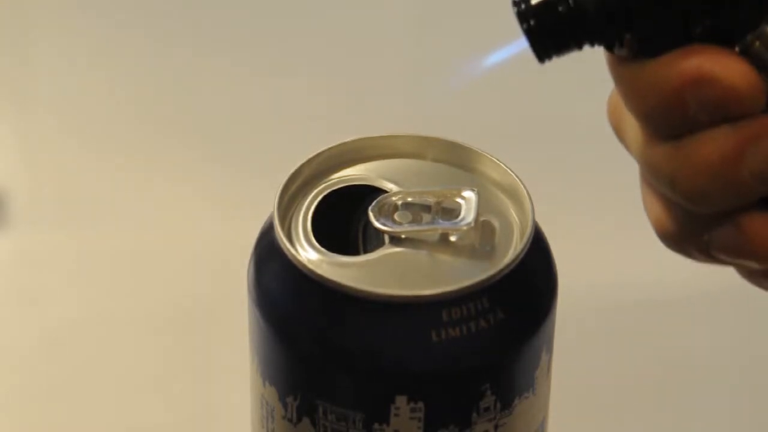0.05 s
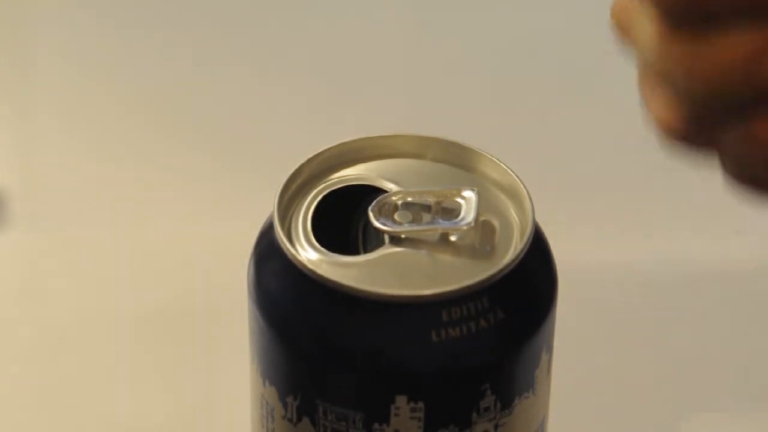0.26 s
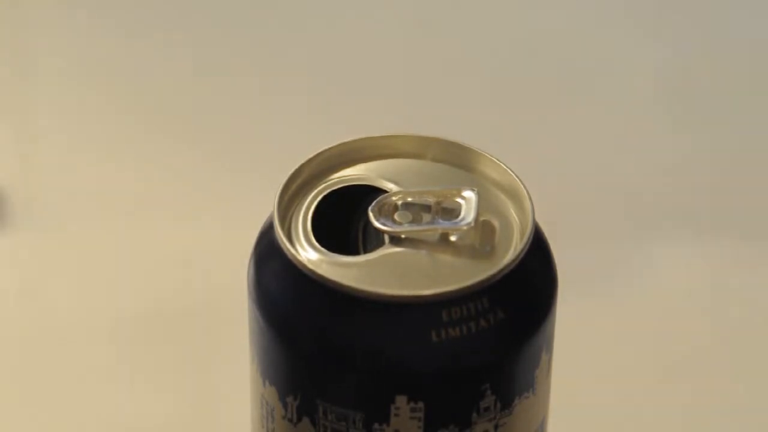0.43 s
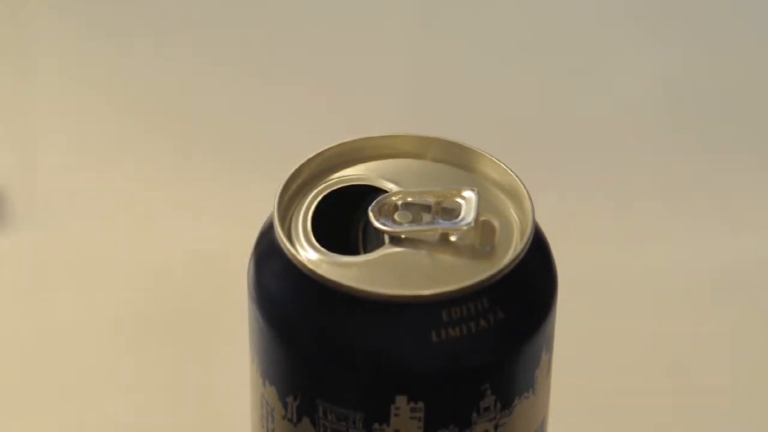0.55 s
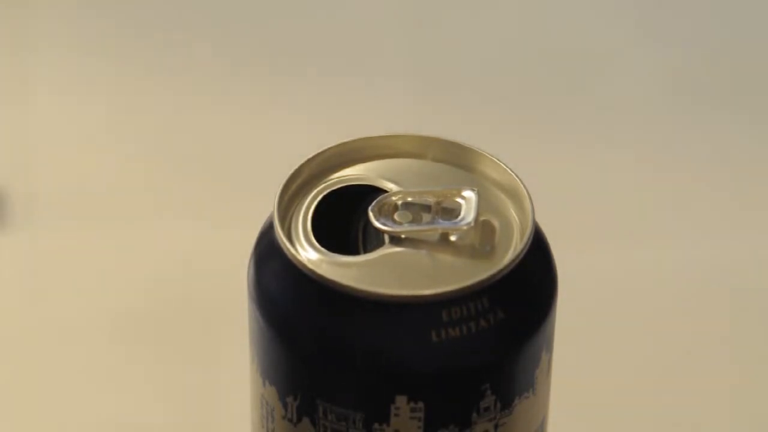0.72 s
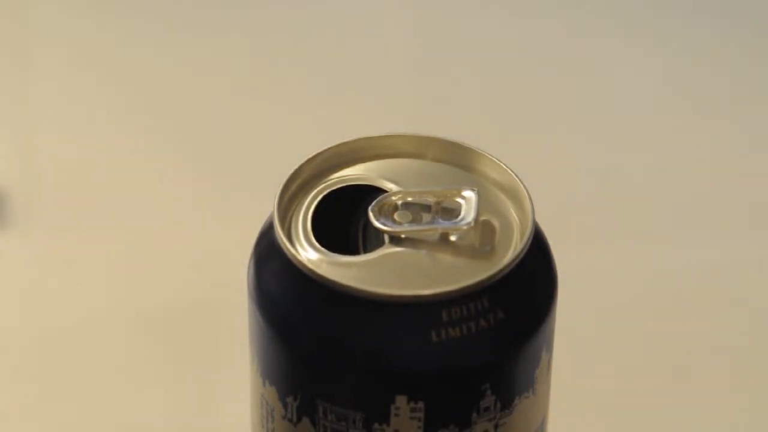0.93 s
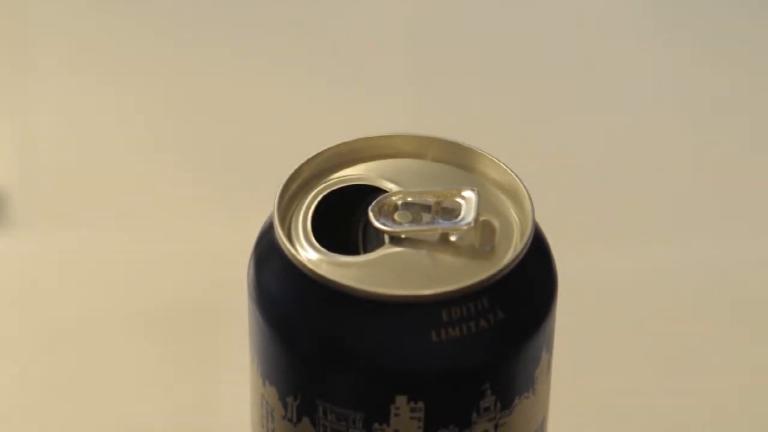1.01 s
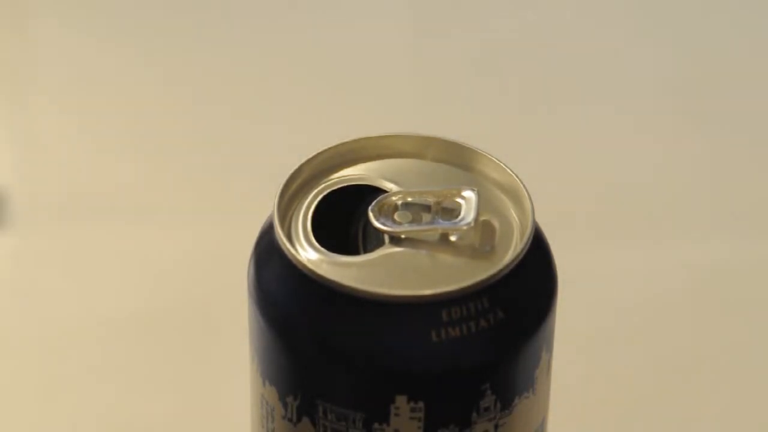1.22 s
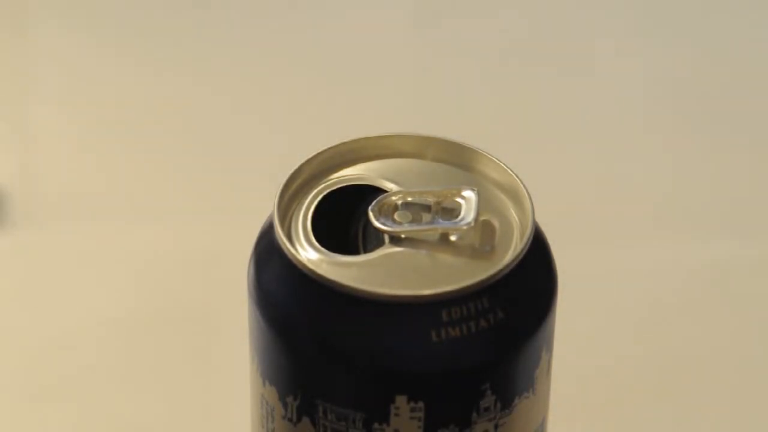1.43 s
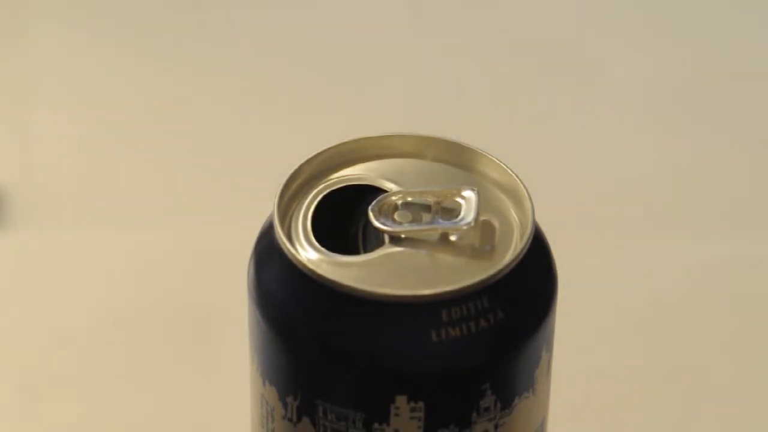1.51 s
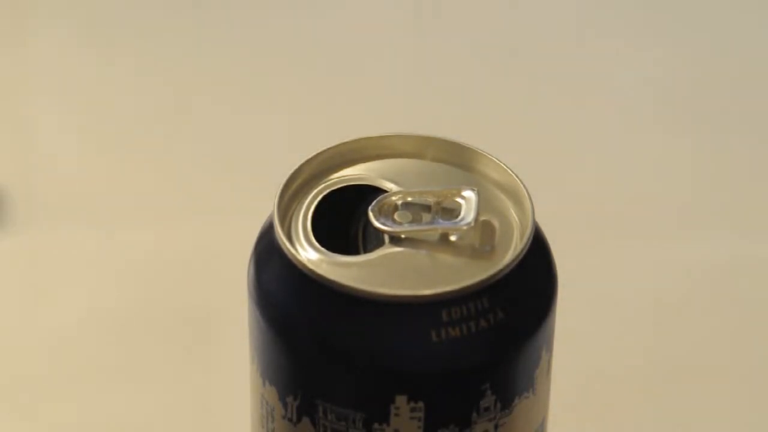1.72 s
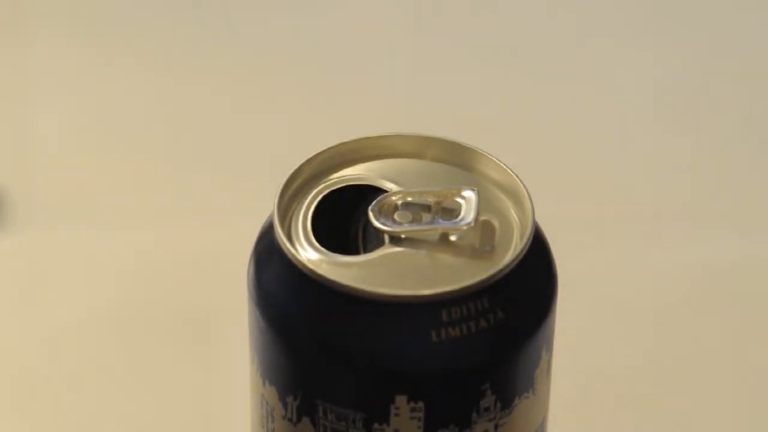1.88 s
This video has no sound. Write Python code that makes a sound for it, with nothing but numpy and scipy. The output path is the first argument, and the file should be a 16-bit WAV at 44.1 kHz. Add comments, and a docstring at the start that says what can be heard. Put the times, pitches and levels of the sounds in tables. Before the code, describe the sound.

Close up in a small, quiet room, a torch lighter's gas jet hisses briefly and stops with a sharp click. After that there is only a faint electrical and fan hum.

```python
"""A small quiet room, one microphone close to a butane torch lighter. At first the gas jet hisses
steadily and rings the nozzle. The trigger creaks with two small ticks as the thumb lets go, then at
0.21 s snaps back with one sharp click that shuts off the gas and rings briefly in the room.
The recorder, dull above the mid treble, just clips that click. Room tone remains:
a low mains and fan hum over moving air, with a faint hiss that comes and goes."""
import sys
import numpy as np
from scipy import signal
from scipy.fft import rfft, irfft, next_fast_len
from scipy.io import wavfile
from scipy.ndimage import map_coordinates

SR = 44100
rng = np.random.default_rng(int(sys.argv[2]) if len(sys.argv) > 2 else 0)


def put_to_file(sound):
    """Save the sound as 16-bit audio at rate SR, in the file named by the first command-line argument."""
    columns = np.atleast_2d(sound).T  # one column per channel
    safe = np.clip(columns, -1, 1)
    whole_steps = np.round(safe * 32767)
    wavfile.write(sys.argv[1], SR, whole_steps.astype(np.int16))


N = 85995
T = np.arange(N) / SR

# rush of the gas jet: f/Hz, relative level/dB
JET_SPECTRUM = [(100, -39.5), (400, -24), (600, -7), (850, 2.5), (1250, 2.5), (2000, -2.5), (2550, 7.5),
                (3050, 0.5), (3600, 3.5), (4050, -4.5), (4500, 1), (5400, 0.5)]
# nozzle resonances: f/Hz, width/Hz, relative level/dB
NOZZLE_MODES = [(1970, 90, 13.5), (2646, 90, 4), (2600, 64, -8), (3380, 250, -2), (4192, 100, -16),
                (4580, 110, -14.5), (5330, 80, 0)]
# trigger contacts, two ticks and the click's double strike: t/s, level/dB, tilt/(dB per octave)
TRIGGER_CONTACTS = [(0.1446, -26.5, -3), (0.1625, -39, -4), (0.20873, -0.6, 0), (0.21028, -12.5, 21)]
# colour of one contact: f/Hz, relative level/dB
SNAP_SPECTRUM = [(1000, -46.5), (1550, -23), (1900, -11.5), (2300, -15.5), (2750, -6.5), (3200, -0.3),
                 (3700, 0), (4300, -12.5), (5400, 2.5)]
# resonances of the lighter's body: f/Hz, width/Hz, relative level/dB
BODY_MODES = [(4470, 360, 9), (4874, 180, -6)]
# echoes off surfaces near the microphone: delay t/s, relative level/dB
EARLY_ECHOES = [(.0037, -13), (.0061, -20), (0.0104, -21.5), (0.0314, -56.5)]
# time the room's tail takes to fall 60 dB: f/Hz, t/s
TAIL_T60 = [(500, 0.13), (2500, .24), (5500, 0.24)]
# colour of the tail as it starts: f/Hz, relative level/dB
TAIL_SPECTRUM = [(1000, 0), (2700, 5), (3300, -7), (4100, 6), (4600, -2), (4870, -0.5), (5200, -4)]
# mains hum: f/Hz, level/dB
MAINS_TONES = [(120, -62.5), (240, -71), (360, -69)]
# fan hum: f/Hz, level/dB before wavering and swell, unsteadiness/ratio
FAN_TONES = [(201.5, -64, .25), (236, -78, 0.74), (283.7, -72.5, .4), (405.8, -63, 0.12)]
# swell of the fan hum: t/s, relative level/dB
FAN_ENVELOPE = [(0, 4.5), (.2, 4), (.3, 0), (.6, 1.5), (.8, -2), (1.05, -10.5), (1.25, -4.5), (1.45, 3),
                (1.7, 2), (1.95, 4)]
# colour of the moving air: f/Hz, relative level/dB
AIR_SPECTRUM = [(20, -45.5), (35, -11.5), (55, -15), (85, -7.5), (121, -4.5), (163, -7), (230, -1),
                (306, -8.5), (410, -3), (538, -9), (700, -7), (1080, -13), (1950, -14), (3830, -22),
                (5400, -22.5)]
# loudness of the moving air: t/s, level/dB
AIR_ENVELOPE = [(0, -56.5), (.7, -55.5), (1.25, -55.5), (1.45, -55.5), (1.95, -55.5)]
# colour of the faint treble hiss: f/Hz, relative level/dB
HISS_SPECTRUM = [(1000, -9.5), (2500, -8), (4000, -3.5), (4800, 0), (5300, -2)]
# loudness of that hiss: t/s, level/dB
HISS_ENVELOPE = [(.4, -79), (.73, -69.5), (.76, -59.5), (.86, -66), (1.28, -67), (1.34, -63), (1.4, -73.5),
                 (1.5, -83), (1.54, -61), (1.6, -80.5), (1.95, -80.5)]

JET_DB, NOZZLE_DB, FLUTTER_DB = -48, -54.5, 1
GAS_OFF_S, GAS_FALL_DB_PER_S = .208, 340
THUMP_HZ, THUMP_DB, THUMP_T60_S = 220, -32.5, .007  # dull push into the hand, level relative to the snap
TAIL_DB, TAIL_ONSET_S = -10.5, .002
BAND_HZ, BAND_ORDER, CLIP_TOP = 5570, 44, .72  # the recorder's treble limit and clipping ceiling


def gas_jet():
    """Close to the microphone, the gas rushes and rings the nozzle until the valve shuts."""
    rush = noise(lambda hz: amp(along(JET_SPECTRUM, hz)))
    ring = noise(lambda hz: resonances(hz, NOZZLE_MODES))
    flow_db = FLUTTER_DB * wobble(40) - GAS_FALL_DB_PER_S * np.maximum(T - GAS_OFF_S, 0)
    return amp(flow_db) * (amp(JET_DB) * rush + amp(NOZZLE_DB) * ring)


def trigger():
    """Each contact is one hard pulse that rings the small body briefly and pushes the hand."""
    clicks = np.zeros(N)
    for start, db, tilt_db in TRIGGER_CONTACTS:
        def body_response(hz):
            colour_db = along(SNAP_SPECTRUM, hz) + tilt_db * np.log2(np.clip(hz, 1000, BAND_HZ))
            return amp(colour_db) * (1 + resonances(hz, BODY_MODES))

        pulse = np.sinc((T - start) * SR)
        snap = filtered(pulse, body_response)
        snap /= np.abs(lowpass(snap, BAND_HZ, BAND_ORDER)).max()  # peak of 1 within the recorder's band
        age = np.maximum(T - start, 0)
        thump = amp(THUMP_DB - 60 * age / THUMP_T60_S) * np.sin(2 * np.pi * THUMP_HZ * age)
        clicks += amp(db) * (snap + thump)
    return clicks


def room(source):
    """A few near surfaces answer first at the microphone, then a short diffuse tail."""
    hz, t, spectra = signal.stft(rng.standard_normal(SR // 2), SR, nperseg=256)
    gain_db = along(TAIL_SPECTRUM, hz)[:, None] - 60 * t / along(TAIL_T60, hz)[:, None]
    tail = signal.istft(spectra * amp(gain_db), SR, nperseg=256)[1]
    age = np.arange(len(tail)) / SR
    tail *= 1 - np.exp(-(age / TAIL_ONSET_S) ** 2)
    early = filtered(source, lambda f: sum(amp(db) * np.exp(-2j * np.pi * f * delay)
                                           for delay, db in EARLY_ECHOES))
    return early + amp(TAIL_DB) * signal.fftconvolve(source, tail / np.linalg.norm(tail))[:N]


def room_tone():
    """Behind the lighter: steady mains hum, a wavering fan, moving air and a faint, shifting hiss."""
    mains = sum(tone(hz, db) for hz, db in MAINS_TONES)
    fan = sum(tone(hz, db) * (1 + unsteadiness * (wobble(10) + 1j * wobble(41)))
              for hz, db, unsteadiness in FAN_TONES)  # each tone wavers in level and phase
    fan *= amp(curve(FAN_ENVELOPE))
    air = amp(curve(AIR_ENVELOPE)) * noise(lambda hz: amp(along(AIR_SPECTRUM, hz)))
    hiss = amp(curve(HISS_ENVELOPE)) * noise(lambda hz: amp(along(HISS_SPECTRUM, hz)))
    return np.real(mains + fan) + air + hiss


def amp(db):
    """Decibels to gain."""
    return 10 ** (np.asarray(db) / 20)


def along(points, hz):
    """Rows of f/Hz, value, interpolated on a log frequency axis."""
    f, values = np.transpose(points)
    return np.interp(np.log(hz + 1), np.log(f + 1), values)


def curve(rows):
    """Rows of t/s, value, interpolated at every sample."""
    return np.interp(T, *np.transpose(rows))


def wobble(rate):
    """A smooth random curve, rate knots a second."""
    return map_coordinates(rng.standard_normal(256), [T * rate], mode="mirror")


def tone(hz, db):
    """A complex tone of random phase whose real part has an rms level of db."""
    return amp(db) * np.sqrt(2) * np.exp(2j * np.pi * (hz * T + rng.random()))


def noise(response):
    """Coloured noise of rms 1, cut off just above the recorder's band."""
    coloured = filtered(rng.standard_normal(N), lambda hz: response(hz) * (hz < 1.1 * BAND_HZ))
    return coloured / np.sqrt(np.mean(coloured ** 2) + 1e-20)


def resonances(f, modes):
    """The summed response of modes given as f/Hz, width/Hz, level/dB."""
    return sum(amp(db) * 1j * f * width / (centre ** 2 - f ** 2 + 1j * f * width)
               for centre, width, db in modes)


def filtered(x, response):
    """x through a frequency response."""
    size = next_fast_len(N + SR // 2)
    return irfft(rfft(x, size) * response(np.fft.rfftfreq(size, 1 / SR)), size)[:N]


def lowpass(x, hz, order):
    """A steep, smooth-edged low-pass."""
    return filtered(x, lambda f: 1 / (1 + (f / hz) ** (2 * order)))


def scene():
    """At the microphone: the lighter close by, its clicks echoing in the room, and room tone behind."""
    clicks = trigger()
    return (gas_jet() + clicks + room(clicks) + room_tone())[None]


def record(dry):
    """A narrow-band mono recorder whose output clips the upward peak of the click."""
    narrow = lowpass(dry[0], BAND_HZ, BAND_ORDER)
    clipped = np.minimum(narrow, CLIP_TOP)
    return lowpass(clipped, hz=16000, order=44)[None]


dry = scene()
out = record(dry)
put_to_file(out)
```